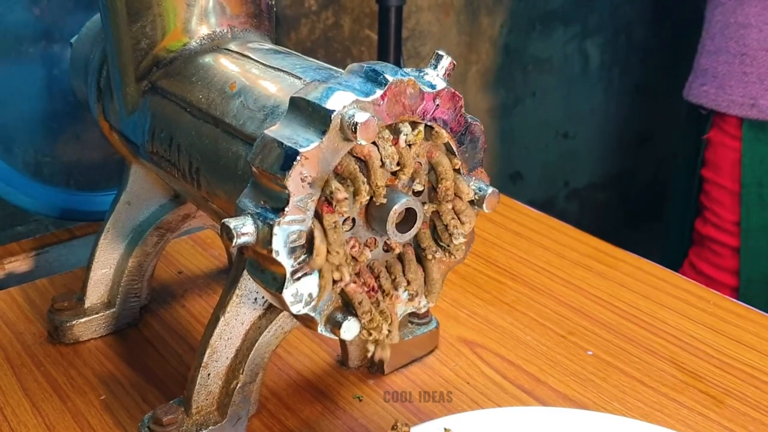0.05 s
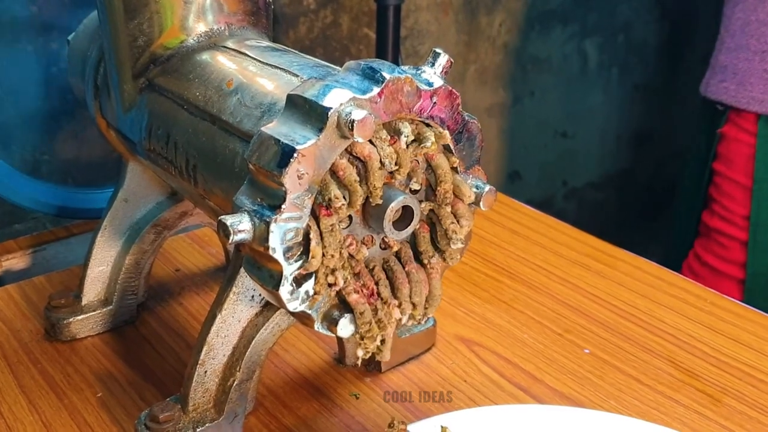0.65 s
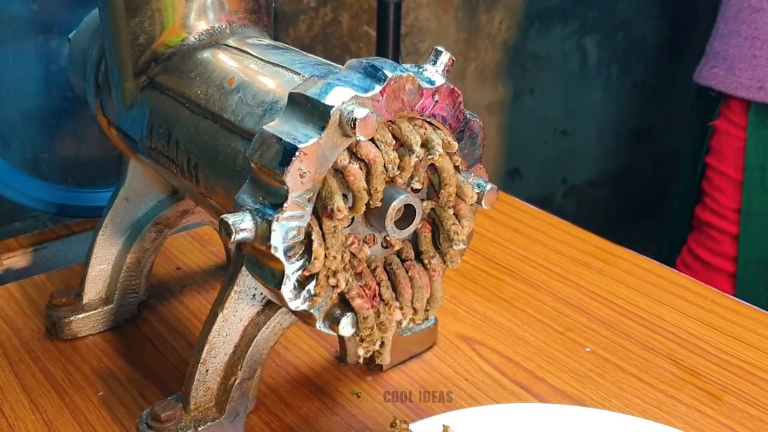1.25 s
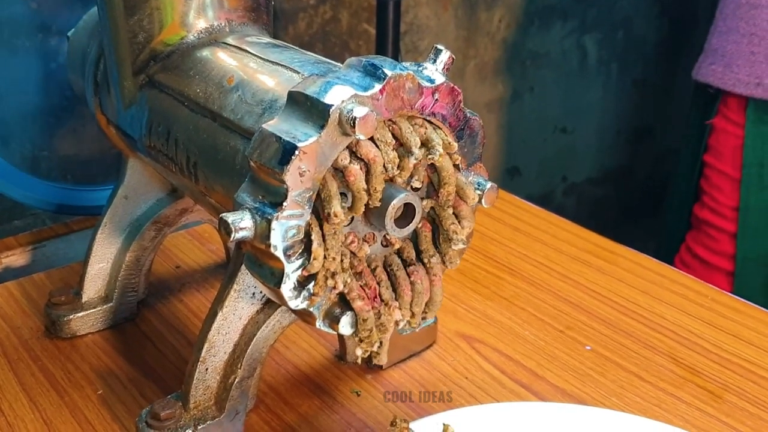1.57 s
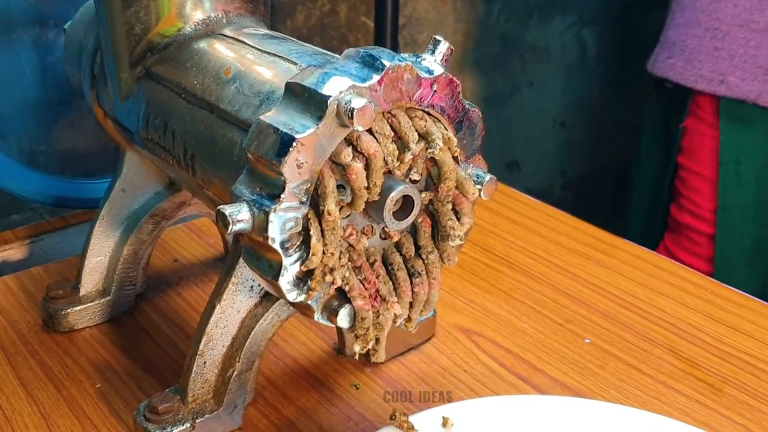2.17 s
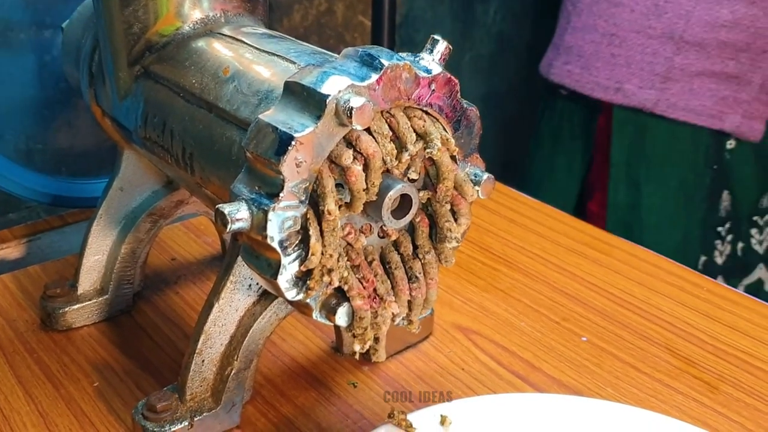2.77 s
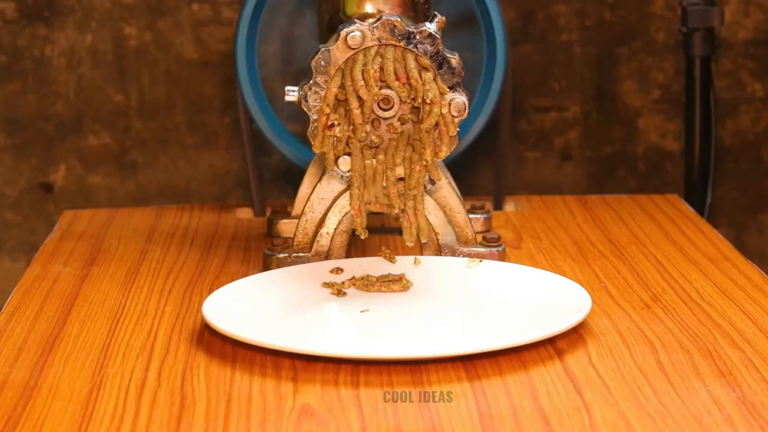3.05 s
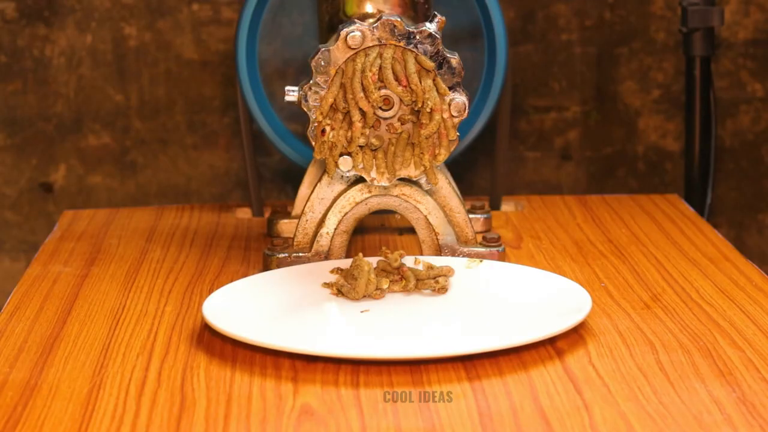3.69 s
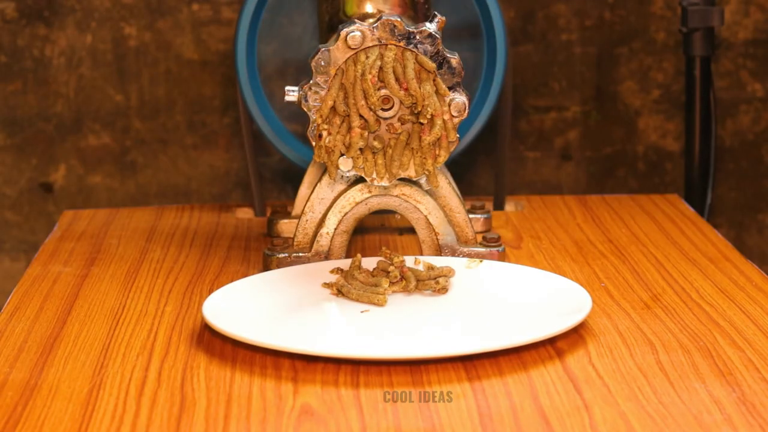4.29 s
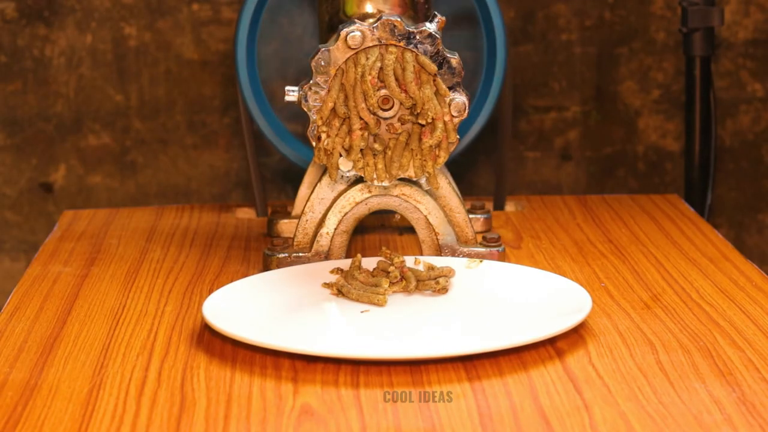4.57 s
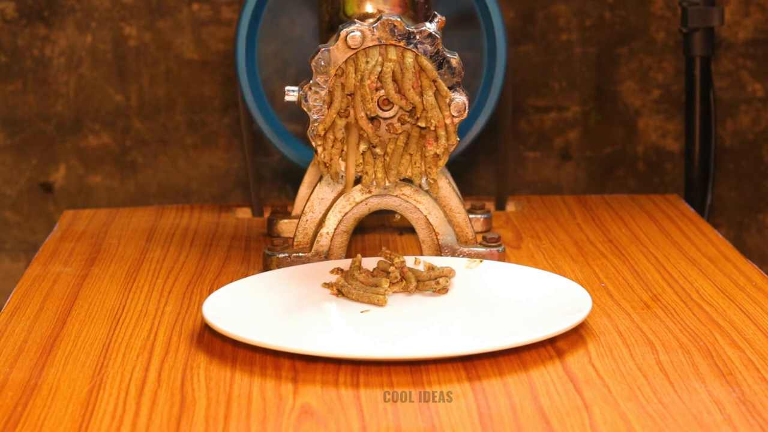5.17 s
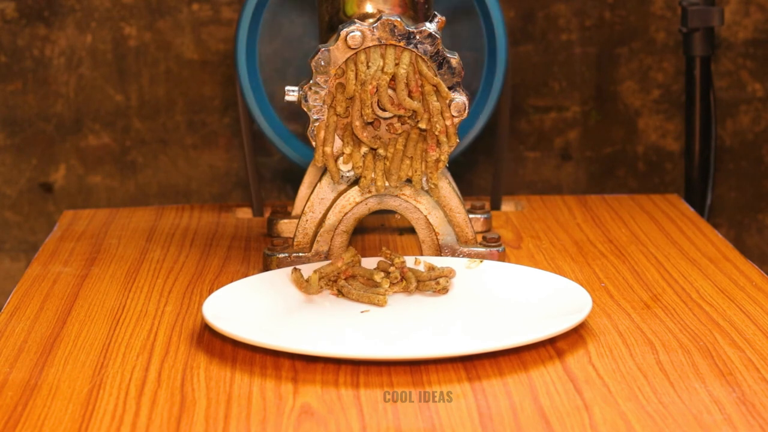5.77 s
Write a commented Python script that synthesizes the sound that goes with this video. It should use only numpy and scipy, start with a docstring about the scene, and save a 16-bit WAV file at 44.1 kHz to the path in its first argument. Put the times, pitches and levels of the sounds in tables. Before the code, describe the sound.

An electric meat grinder throbs and clatters as wet mince pops, before the sound suddenly turns lighter and more distant.

```python
"""On a wooden table, a belt-driven meat grinder minces fish. The motor hums and the drive pushes about
seven times a second. With each push the table throbs and the auger rattles and knocks, exciting the
resonances of its cast barrel and frame, while air pockets pop in the wet mince leaving the plate.
It is heard first from close beside the barrel, boomy and wide, then from the front, thinner and
farther off."""
import sys
import numpy as np
from scipy import signal
from scipy.fft import rfft, irfft, next_fast_len
from scipy.io import wavfile
from scipy.ndimage import map_coordinates

SR = 44100
rng = np.random.default_rng(int(sys.argv[2]) if len(sys.argv) > 2 else 0)


def to_wav(sig):
    """Store sig (one row per channel, or 1-D mono) as 16-bit WAV at the path in sys.argv[1].

    Samples outside -1..1 are clipped; the rate is SR.
    """
    pcm = np.clip(np.atleast_2d(sig), -1, 1) * 32767
    pcm = np.round(pcm).astype(np.int16)
    wavfile.write(sys.argv[1], SR, pcm.T)  # frames by channels


N = 257544
TIME = np.arange(N) / SR
CUT_S = 2.97  # the scene changes from beside the barrel to the front
STROKE_HZ, FIRST_STROKE_S = 7.2, .1  # pushes of the drive
SIDE, FRONT = 2, 3  # level columns of the mode tables; all table levels are relative

# Hard knocks of the auger in the barrel: time_s, clack_db, thud_db, clink_db
HARD_KNOCKS = [(0.076, -31, -29, -32), (0.221, -21, -20, -39), (0.263, -27, -21, -46),
               (0.314, -21, -23.5, -33.5), (0.349, -20.5, -23, -37), (0.381, -19, -42, -47),
               (0.437, -20.5, -21, -45), (0.505, -21, -15.5, -35), (0.573, -25, -23, -38),
               (0.72, -18.5, -15.5, -39), (0.746, -14, -14, -39), (0.759, -19.5, -17, -41),
               (0.7908, -16, -12.5, -16.5), (0.9, -17, -17, -48), (0.911, -18.5, -20.5, -47),
               (0.961, -21, -16, -46), (1.0425, -20.5, -17.5, -45), (1.0677, -20, -26, -20.5),
               (1.183, -18.5, -18.5, -51), (1.3191, -17, -24, -42), (1.41, -20.5, -30, -50),
               (1.462, -23.5, -20, -27), (1.49, -18.5, -14.5, -34), (1.609, -19, -24, -35),
               (1.6301, -15.5, -10.5, -17.5), (1.719, -17, -25, -51), (1.742, -23, -17, -33),
               (1.763, -18, -24, -24), (1.881, -19.5, -12.5, -24.5), (2.015, -23, -33, -47),
               (2.073, -20, -33, -50), (2.151, -18, -16, -35), (2.164, -35, -18.5, -42),
               (2.178, -19.5, -17.5, -20.5), (2.287, -20, -25, -48), (2.322, -19, -11, -42),
               (2.35, -22.5, -22, -31), (2.368, -19, -19, -53), (2.423, -19.5, -18, -50),
               (2.472, -22.5, -32, -38), (2.563, -19, -21, -42), (2.702, -18.5, -19, -45),
               (2.838, -18.5, -15, -42), (2.868, -19.5, -14.5, -23), (2.973, -18, -21, -36),
               (3.107, -24, -30, -52), (3.327, -28, -42, -46), (3.415, -23, -29.5, -49),
               (3.601, -22.5, -35, -37), (3.643, -24.5, -33, -54), (3.703, -20.5, -26.5, -42),
               (3.997, -19.5, -28.5, -36), (4.058, -30, -34, -39), (4.201, -29, -30.5, -54),
               (4.238, -22, -27, -40), (4.26, -22, -31.5, -42), (4.286, -23.5, -30.5, -45),
               (4.403, -30, -29.5, -40.5), (4.52, -21.5, -28, -54), (4.693, -20, -31, -33.5),
               (4.848, -27.5, -45, -57), (4.968, -19, -29, -34), (5.117, -21, -29, -47),
               (5.242, -21, -33, -48), (5.261, -28, -31, -43), (5.39, -26.5, -32.5, -40),
               (5.637, -23, -27, -49), (5.675, -21, -28.5, -45), (5.805, -19, -27.5, -34)]
# The housing rocks on its feet: start_s, level_db, length_s
HOUSING_CLUNKS = [(0.253, -23, 0.012), (0.437, -21, 0.012), (0.502, -22.5, 0.013), (0.584, -22, 0.0083),
                  (0.718, -21, 0.0071), (0.922, -23.5, 0.015), (1.067, -21.5, .012), (1.212, -20, 0.011),
                  (1.315, -16.5, 0.0096), (1.547, -19, 0.0091), (1.631, -16.5, 0.0081),
                  (1.877, -19, 0.0086), (2.022, -22, 0.018), (2.295, -21, 0.026), (2.334, -22.5, 0.024),
                  (2.844, -21.5, 0.019), (3.036, -36, 0.015), (3.226, -33, .03), (3.575, -32, 0.015),
                  (3.641, -28.5, 0.037), (3.849, -30, 0.0098), (3.886, -32, 0.013), (4.055, -30, 0.0062),
                  (4.398, -30, 0.023), (4.579, -31.5, 0.015), (4.989, -32, 0.024), (5.662, -32.5, 0.043)]
# Modes of the cast metal: pitch_hz, bandwidth_hz, side_db, front_db
CASTING_MODES = [(1146, 43, 1.5, -20), (1578, 12, -24, 3), (1884, 16, 1.5, 2.5), (2494, 53, -16, -1.5),
                 (2630, 65, 3, -20), (2906, 23, -19, -3), (3640, 15, 10.5, 6.5), (5370, 47, 6, -15),
                 (5250, 45, -22, 8), (5780, 26, -22, 15), (7250, 87, -20, 11)]


def grinder_beside():
    """Resonance beside the barrel: a booming frame, knocks with a strong, quickly dying tail, wide image."""
    # Load on the auger: time_s, rattle_db, grind_db
    load = [(0.02, -24, -31), (0.34, -25, -33), (1.19, -26, -33.5), (1.7, -22.5, -32.5),
            (2.03, -24.5, -35.5), (2.42, -27, -36.5), (2.82, -26, -37.5), (2.93, -26, -37.5)]
    # Response of table and frame: frequency_hz, gain_db
    body = [(25, -50), (53, -32.5), (90, -3.5), (146, 3.5), (193, -2.5), (238, -9.5), (327, -5.5),
            (382, -2.5), (467, -12), (486, -27), (510, -5), (572, -22.5), (618, -13.5), (707, -22),
            (841, -31.5), (900, -25), (1170, -56), (1980, -120)]
    # Response of the barrel: frequency_hz, gain_db
    barrel = [(410, -15.5), (700, -0.5), (852, 4.5), (946, -0.5), (1150, 0.5), (1640, -5.5), (2330, -9),
              (2700, -12), (3070, -16), (4920, -13), (7390, -28.5), (8530, -34), (12200, -28), (15000, -41),
              (16000, -34)]
    # Likeness of left and right: frequency_hz, correlation
    coherence = [(60, 0.98), (130, 0.99), (290, 0.91), (640, 0.55), (1410, 0.32), (3100, 0.02),
                 (6820, 0.02), (15000, -0.05)]
    # Left level minus right: frequency_hz, difference_db
    balance = [(60, 1.0), (110, 2), (200, 0.48), (380, 0.77), (700, 2.6), (1290, 1.9), (2380, 5.1),
               (4400, 8.2), (8120, 2.2), (15000, 4.3)]
    hits = [k for k in HARD_KNOCKS if k[0] < CUT_S]
    grip = slack(hits, dip_db=-6)
    hits += taps(hits, late_s=-.024, scatter_s=.006, clack_db=-23, thud_db=-24, clink_db=-47)
    drag = aftermath([(k[0], k[1]) for k in hits], level_db=-17.5, delay_s=.0053, width_s=.013)
    shudder = aftermath([(k[0], k[2]) for k in hits], level_db=-8.5, delay_s=.0034, width_s=.02)
    push = surge(late_s=.0015, width_s=.015)
    sound = grip * churn(load, push, drag, shudder, body, barrel, SIDE, rattle_db=.5, grind_db=-2.52,
                         rattle_push_db=1.5, grind_push_db=1, metal_db=-5,
                         rate=500, spread_db=3, smooth_db=3, scrape_t60=.05)
    sound += knocks(hits, body, barrel, SIDE, clack_db=13, thud_db=22.5, clink_db=25.5, crack_db=15,
                    contact_t60=.021, tail_t60=.085, tail_db=.5, rebound_s=.0098, rebound_db=-5)
    sound += clunks([c for c in HOUSING_CLUNKS if c[0] < CUT_S], SIDE, level_db=-1)
    motor = motor_hum(column=1, waver_db=1) * amp([[.6], [-.6]])
    return stereo(sound, coherence, balance, lead_rad=.33) + motor


def grinder_front():
    """Reverberation farther off, in front: knocks with a longer tail, less boom and more smacking."""
    # Load on the auger: time_s, rattle_db, grind_db
    load = [(3.03, -32, -38.5), (3.36, -35.5, -40.5), (4.38, -34.5, -37.5), (4.64, -36, -39.5),
            (5.66, -36, -39.5), (5.8, -38, -41)]
    # Response of table and frame: frequency_hz, gain_db
    body = [(53, -55.5), (90, -14), (194, -8), (244, -21.5), (284, -15), (361, -11), (392, -9.5), (438, -2),
            (470, -8), (509, -14.5), (560, -10.5), (620, -14), (668, -7.5), (777, -15.5), (904, -14.5),
            (1000, -19.5), (1300, -73), (2200, -120)]
    # Response of the barrel: frequency_hz, gain_db
    barrel = [(530, -15.5), (900, -3), (1020, 0), (1170, 0), (1510, -9), (1900, -7.5), (2040, -8.5),
              (2960, -13.5), (3300, -17), (3770, -13), (5220, -26), (7140, -20.5), (10000, -25),
              (14500, -42), (16000, -37)]
    # Likeness of left and right: frequency_hz, correlation
    coherence = [(60, 1.0), (130, 1.0), (290, 0.98), (640, 0.97), (1410, 0.78), (3100, 0.69), (6820, 0.51),
                 (15000, 0.23)]
    # Left level minus right: frequency_hz, difference_db
    balance = [(60, 0.0), (110, 0.0), (200, 0.0), (380, -1.5), (700, -0.5), (1290, -1.0), (2380, -3.5),
               (4400, -2.0), (8120, -3.5), (15000, -3.5)]
    hits = [k for k in HARD_KNOCKS if k[0] >= CUT_S]
    grip = slack(hits, dip_db=-5)
    hits += taps(hits, late_s=.012, scatter_s=.012, clack_db=-29.5, thud_db=-38, clink_db=-54)
    drag = aftermath([(k[0], k[1]) for k in hits], level_db=-19.5, delay_s=.0029, width_s=.018)
    shudder = aftermath([(k[0], k[2]) for k in hits], level_db=-2.5, delay_s=.0093, width_s=.0084)
    push = surge(late_s=.017, width_s=.0051)
    sound = grip * churn(load, push, drag, shudder, body, barrel, FRONT, rattle_db=-1, grind_db=-6,
                         rattle_push_db=-4, grind_push_db=4.5, metal_db=-19,
                         rate=350, spread_db=.5, smooth_db=.5, scrape_t60=.041)
    sound += knocks(hits, body, barrel, FRONT, clack_db=9.5, thud_db=24.5, clink_db=34.5, crack_db=17,
                    contact_t60=.029, tail_t60=.11, tail_db=-3.5, rebound_s=.0054, rebound_db=-7)
    sound += clunks([c for c in HOUSING_CLUNKS if c[0] >= CUT_S], FRONT, level_db=1.5)
    sound += groan(load, FRONT, level_db=-40.5, load_share=.62)
    sound += smacking(level_db=-5.5, between_db=-56, sizzle_db=-12)
    motor = motor_hum(column=2, waver_db=1.6) * amp([[-.5], [.5]])
    return stereo(sound, coherence, balance, lead_rad=-.13) + motor


def churn(load, push, drag, shudder, body, barrel, column, rattle_db, grind_db,
          rattle_push_db, grind_push_db, metal_db, rate, spread_db, smooth_db, scrape_t60):
    """Friction: the auger's small contacts rattle the frame and rasp in the barrel as load varies."""
    rattle_load_db, grind_load_db = curves(load)
    contacts = grains(rate, spread_db)
    rattle = unit(ring(contacts + grains(rate=900, spread_db=-2.5), body))
    rasp = ring(scrapes(contacts, scrape_t60) + amp(smooth_db) * rng.standard_normal((2, N)), barrel)
    rasp = unit(rasp + amp(metal_db) * casting_ring(rasp, column))
    rattle_gain = np.hypot(amp(rattle_load_db + rattle_db + rattle_push_db * push), shudder)
    rasp_gain = np.hypot(amp(grind_load_db + grind_db + grind_push_db * push), drag)
    return rattle_gain * rattle + rasp_gain * rasp


def grains(rate, spread_db):
    """A Poisson process: two trains of tiny contacts of uneven size at shared random moments."""
    hit = rng.random(N) < rate / SR
    size = amp(spread_db * np.minimum(rng.exponential(size=N), 3))
    return unit(hit * size * rng.standard_normal((2, N)))


def scrapes(contacts, t60):
    """Exponential decay: each contact's energy dies away as a short burst of noise."""
    energy = signal.lfilter([1], [1, -amp(-120 / (t60 * SR))], np.mean(contacts ** 2, axis=0))
    return unit(np.sqrt(energy) * rng.standard_normal((2, N)))


def casting_ring(rasp, column, top_hz=3800):
    """Forced vibration: soft contacts shake only the lower modes of the casting."""
    return filtered(rasp, lambda hz: resonance(CASTING_MODES, column, hz) / (1 + (hz / top_hz) ** 6))


def surge(late_s, width_s):
    """Periodic forcing: a Gaussian bump from 0 to 1 at every stroke of the drive."""
    turn = ((TIME - FIRST_STROKE_S - late_s) * STROKE_HZ + .5) % 1 - .5
    return np.exp(-.5 * (turn / STROKE_HZ / width_s) ** 2)


def slack(hits, dip_db, early_s=.005, width_s=.007):
    """Loss of contact: the grinding dips as the auger runs free just before a hard knock."""
    free = np.max([np.exp(-((TIME - k[0] + early_s) / width_s) ** 2) for k in hits], axis=0)
    return amp(dip_db * free)


def aftermath(hits, level_db, delay_s, width_s):
    """Swells that add in power: after each (time_s, level_db) hit the auger drags or the frame shakes."""
    power = sum(amp(2 * db) * np.exp(-((TIME - s - delay_s) / width_s) ** 2) for s, db in hits)
    return amp(level_db) * np.sqrt(power)


def knocks(hits, body, barrel, column, clack_db, thud_db, clink_db, crack_db,
           contact_t60, tail_t60, tail_db, rebound_s, rebound_db):
    """Impact excitation: a knock clacks in the barrel, rings the casting, jolts the frame and rebounds."""
    # Tilt that makes knocks duller than the grinding: frequency_hz, gain_db
    clack_tilt = [(600, 2), (2500, 4.5), (5000, 0.5), (9000, -8), (15000, 1)]
    # Spectrum of steel striking steel: frequency_hz, gain_db
    crack_colour = [(900, -15), (2200, -9), (2750, 12.5), (3300, -22), (4300, -4.5), (5100, -7),
                    (5700, -14), (7500, -27), (12000, -29)]
    clacks, cracks, pushes = np.zeros((3, 2, N))
    for s, clack, thud, clink in hits:
        add(clacks, s, amp(clack + clack_db) * rippled(blow(contact_t60, tail_t60, tail_db)))
        bounce_s = s + rebound_s * (.5 + rng.random())
        add(clacks, bounce_s, amp(clack + clack_db + rebound_db) * blow(contact_t60, tail_t60, tail_db))
        add(clacks, s + .001112, amp(clink + clink_db) * chime(column, vary_db=4))
        add(cracks, s, amp(clink + crack_db) * blow(contact_t60=.012, tail_t60=tail_t60, tail_db=-9))
        add(pushes, s + .00089, amp(thud + thud_db) * np.array([[-1], [.5 * rng.normal()]]))
    return ring(clacks, barrel, clack_tilt) + ring(cracks, crack_colour) + ring(pushes, body)


def taps(hard, late_s, scatter_s, clack_db, thud_db, clink_db, spread_db=2.5):
    """Quasi-periodic impacts: strokes without a hard knock give a light one; rows like HARD_KNOCKS."""
    strokes = FIRST_STROKE_S + late_s + np.arange(int(N / SR * STROKE_HZ)) / STROKE_HZ
    chance = rng.uniform(-1.4, 1, (len(strokes), 4))
    free = [min(abs(s - k[0]) for k in hard) > .02 for s in strokes]
    levels_db = np.array([clack_db, thud_db, clink_db])
    return [(s + scatter_s * c[0], *(levels_db + spread_db * c[1:]))
            for s, c in zip(strokes[free], chance[free])]


def blow(contact_t60, tail_t60, tail_db):
    """Direct and diffuse sound: a brief rough contact of energy 1 and its tail, in two versions."""
    t = np.arange(SR // 4) / SR
    decays = amp(-60 * t / np.array([contact_t60, tail_t60])[:, None, None])
    contact, tail = rng.standard_normal((2, 2, len(t))) * decays
    return (unit(contact) + amp(tail_db) * unit(tail)) / np.sqrt(len(t))


def rippled(burst, spacing_hz=260, depth_db=2.5):
    """Point of impact: each knock lands elsewhere and favours other pitches, at the same energy."""
    size = burst.shape[1]
    knot = np.fft.rfftfreq(size, 1 / SR) / spacing_hz
    ripple = map_coordinates(rng.standard_normal(int(knot[-1]) + 4), [knot])
    margin = SR // 400
    spectrum = rfft(np.roll(burst, margin, axis=1)) * amp(depth_db * ripple)
    coloured = irfft(spectrum, size)[:, margin:-margin]
    return coloured * np.linalg.norm(burst) / np.linalg.norm(coloured)


def chime(column, vary_db):
    """Free vibration: the casting's damped modes ring in a new balance each time, in two versions."""
    t, modes = np.arange(SR // 4) / SR, np.array(CASTING_MODES)
    hz, width = modes[:, :1], modes[:, 1:2]
    level, other = rng.standard_normal((2, len(modes)))
    waves = 2 * np.pi * width / SR * np.exp(-np.pi * width * t) * np.cos(2 * np.pi * hz * t)
    gains = amp(modes[:, column] + vary_db * level)
    return np.array([gains, gains * other]) @ waves


def clunks(rows, column, level_db):
    """Transient excitation: each time the housing rocks, a short rough shove rings its low modes."""
    sound, t = np.zeros((2, N)), np.arange(SR // 4) / SR
    response = housing(column, np.fft.rfftfreq(len(t), 1 / SR))
    for s, db, length_s in rows:
        shove = rng.standard_normal((2, len(t))) * (t < length_s)
        clunk = irfft(rfft(shove) * response, len(t))
        clunk /= np.linalg.norm(clunk, axis=1, keepdims=True)
        add(sound, s, amp(db + level_db) * np.sqrt(length_s * SR) * clunk)
    return sound


def groan(load, column, level_db, load_share, flutter_db=1.3):
    """Sustained excitation: the drive keeps the housing's modes groaning, louder as the auger labours."""
    load_db = curves(load)[0]
    excess_db = load_db - load_db[round(CUT_S * SR):].mean()
    gain = amp(level_db + load_share * excess_db + flutter_db * wobble(24))
    return gain * unit(filtered(rng.standard_normal((2, N)), lambda hz: housing(column, hz)))


def housing(column, hz, low_hz=150, high_hz=900):
    """Band-pass response of the heavy housing: its low modes, without deep bass or treble."""
    # Modes of the housing: pitch_hz, bandwidth_hz, side_db, front_db
    modes = [(314, 19, -7, -20.5), (362.5, 25, 11.5, -13), (437, 29, -1.5, 1.5), (664, 30.5, -10.5, -1),
             (688, 64, -35.5, -17)]
    return resonance(modes, column, hz) * hz ** 4 / (hz ** 4 + low_hz ** 4) / (1 + (hz / high_hz) ** 6)


def table_throb(swell_db, late_s, width_s, steady_db, uneven_db):
    """Structure-borne sound: the table rumbles in short swells, one for each stroke of the drive."""
    # Response of the wooden table: frequency_hz, gain_db
    wood = [(20, -66), (35, -58), (46, -4), (58, 6.5), (68, 0.5), (77, -7), (95, -4.5), (125, -5),
            (220, -55)]
    # How hard the drive shakes the table: time_s, level_db
    shaking = [(0.0, -20.5), (1.7, -16), (2.89, -12), (2.99, -38.5), (5.84, -49)]
    swells = amp(swell_db + uneven_db * wobble(STROKE_HZ)) * surge(late_s, width_s)
    analytic = signal.hilbert(ring(rng.standard_normal((1, N)), wood)[0])
    even = np.cos(np.angle(analytic))[None]  # phase only, so the swells shape the strength
    rumble = unit(ring(even, [(32, -18.5), (47, .5), (110, 7.5), (250, -24.5)]))
    return rumble * amp(curves(shaking)[0]) * (swells + amp(steady_db)) * amp([[.5], [-.5]])


def squelch(side_db, front_db, crackle_db):
    """Air pockets burst in the mince: sharp and set in fine crackle close by, softer from the front."""
    # The largest air pockets: start_s, level_db, pitch_hz
    pockets = [(0.05, -24, 12900), (0.382, -26.5, 15500), (0.5741, -37, 11000), (0.7447, -33, 14700),
               (0.7574, -36, 7220), (0.7901, -41, 8100), (0.8046, -34, 12300), (0.8994, -43, 7070),
               (0.9617, -38, 11000), (1.3189, -41, 7060), (1.487, -34, 12500), (1.6062, -35, 12300),
               (1.7424, -37, 14800), (2.0138, -35, 15100), (2.1495, -42, 7000), (2.177, -46, 7050),
               (2.3476, -38, 11300), (2.388, -36, 8580), (2.4219, -40, 10600), (2.8374, -37, 9390),
               (2.974, -25.5, 6960), (3.094, -36, 7040), (3.4136, -40, 7120), (3.8866, -38, 7310),
               (3.936, -34, 7140), (4.2114, -37, 9810), (4.2373, -38, 7610), (4.836, -32, 7360),
               (4.951, -30, 7110), (5.0865, -32, 7170), (5.2404, -37, 9510), (5.5648, -35, 7260),
               (5.6074, -34, 8200), (5.764, -39, 7100)]
    crackle = bubbles(rate=90, spread_db=8, low_hz=8000, high_hz=16000, life_s=.0003)
    sound = (TIME < CUT_S) * amp(crackle_db) * crackle
    for s, db, hz in pockets:
        if s < CUT_S:
            burst = amp(db + side_db) * pop(hz, contact_t60=.008, tail_t60=.04, octaves=.35, broad_db=-5)
        else:
            burst = amp(db + front_db) * pop(hz, contact_t60=.018, tail_t60=.08, octaves=.25, broad_db=-10)
        add(sound, s, burst)
    return sound


def pop(pitch_hz, contact_t60, tail_t60, octaves, broad_db):
    """Cavity resonance: a bursting pocket gives a broad snap of energy 1 with a peak at its own pitch."""
    # Broad spectrum of popping mince: frequency_hz, gain_db
    mince = [(600, -20), (1500, 3), (4000, 17), (7000, 1), (11000, 3), (15500, -3)]
    snap = blow(contact_t60, tail_t60, tail_db=-4)
    size = snap.shape[1]
    hz = np.fft.rfftfreq(size, 1 / SR)
    peak = np.exp(-.5 * (np.log2((hz + 1) / pitch_hz) / octaves) ** 2)
    colour = peak + amp(broad_db + along(mince, hz))
    return unit(irfft(rfft(snap) * colour, size)) / np.sqrt(size)


def smacking(level_db, between_db, sizzle_db, clump_db=2):
    """Adhesion fails: sticky strands tear from the plate in clumps of tiny snaps over a faint sizzle."""
    # Tearing strands: middle_s, level_db, length_s
    tears = [(3.117, -46, 0.043), (3.297, -50.5, .05), (3.406, -50, 0.038), (3.58, -49.5, 0.039),
             (3.66, -51, .03), (3.707, -52, 0.027), (3.834, -49, 0.04), (3.932, -43, 0.024),
             (3.99, -48, 0.033), (4.103, -46.5, 0.047), (4.247, -44, 0.063), (4.387, -51, .08),
             (4.542, -46.5, 0.051), (4.684, -42.5, 0.034), (4.805, -43, 0.027), (4.84, -43.5, 0.028),
             (4.97, -45.5, 0.078), (5.018, -44, 0.033), (5.093, -46, 0.024), (5.188, -50, 0.031),
             (5.233, -46.5, 0.034), (5.38, -49, .04), (5.507, -47.5, .045), (5.647, -44.5, 0.043),
             (5.79, -43.5, 0.033)]
    # Spectrum of the tearing: frequency_hz, gain_db
    colour = [(2500, -62), (4800, -5), (5800, 0.5), (6400, -0.5), (7100, 3), (7800, -5.5), (8900, -5),
              (9700, -3.5), (12000, -6.5), (16000, -10)]
    power = amp(2 * between_db)
    power += sum(amp(2 * db) * .5 ** ((2 * (TIME - s) / length_s) ** 2) for s, db, length_s in tears)
    snaps = bubbles(rate=1100, spread_db=7, low_hz=4500, high_hz=12000, life_s=.00028)
    clumps = amp(level_db + clump_db * wobble(90))
    sizzle = amp(sizzle_db) * rng.standard_normal((2, N))
    return np.sqrt(power) * clumps * unit(ring(snaps + sizzle, colour))


def bubbles(rate, spread_db, low_hz, high_hz, life_s):
    """Damped oscillators: tiny wet snaps of random moment, pitch, size and life, in two versions."""
    t = np.arange(SR // 200) / SR
    when, pitch, size, life, *phases = rng.random((int(rate * N / SR), 6)).T[..., None]
    hz = low_hz * (high_hz / low_hz) ** pitch
    envelope = amp(-spread_db * np.log(size + .05)) * np.exp(-t / (life_s * (.5 + life)))
    at = ((when * N).astype(int) + np.arange(len(t))).ravel()
    versions = [envelope * np.sin(2 * np.pi * (hz * t + phase)) for phase in phases]
    return unit(np.array([np.bincount(at, snaps.ravel(), N)[:N] for snaps in versions]))


def motor_hum(column, waver_db, hum_hz=100.08):
    """Magnetic forces hum at multiples of twice the mains frequency, each line wavering a little."""
    # Lines of the hum: multiple, side_db, front_db
    lines = [(1, -38, -53), (2, -47, -55), (3, -48, -56), (5, -39.5, -39.5), (6, -53, -57)]
    sound = np.zeros(N)
    for line in lines:
        gain = amp(line[column] + waver_db * wobble(11))
        phase = 2 * np.pi * (line[0] * hum_hz * TIME + rng.random()) + .038 * wobble(5)
        sound += gain * np.sin(phase)
    return np.sqrt(2) * sound


def stereo(pair, coherence, balance, lead_rad):
    """Interaural coherence: two signals become left and right, alike in the bass, apart in the treble."""
    def width(hz):
        return np.tan(np.arccos(np.clip(along(coherence, hz), 0, 1)) / 2)
    mid, other = pair
    left_lead = filtered(mid, lambda hz: 1j * np.sin(lead_rad) * width(hz))
    side = left_lead + np.cos(lead_rad) * filtered(other, width)
    ears = np.array([mid + side, mid - side])
    return filtered(ears, lambda hz: amp(np.outer([.5, -.5], along(balance, hz))))


def resonance(modes, column, hz):
    """Modal superposition: the summed response of (pitch_hz, bandwidth_hz, levels...) resonators."""
    return sum(amp(m[column]) * 1j * hz * m[1] / (m[0] ** 2 - hz ** 2 + 1j * hz * m[1]) for m in modes)


def ring(x, *colours, size=8192):
    """Convolution with a minimum-phase body of energy 1, shaped by (frequency_hz, gain_db) curves."""
    hz = np.fft.rfftfreq(size, 1 / SR)
    cepstrum = irfft(np.log(amp(sum(along(c, hz) for c in colours)) + 1e-5))
    cepstrum[1:size // 2] *= 2  # folding the cepstrum makes the body causal
    cepstrum[size // 2 + 1:] = 0
    impulse = irfft(np.exp(rfft(cepstrum)))
    return signal.fftconvolve(x, impulse[None] / np.linalg.norm(impulse), axes=1)[:, :N]


def filtered(x, response):
    """Linear filtering: the spectrum of x times a response of frequency."""
    size = next_fast_len(N + SR // 2)
    return irfft(rfft(x, size) * response(np.fft.rfftfreq(size, 1 / SR)), size)[..., :N]


def add(track, s, burst):
    """Superposition: mix a burst into a track at s seconds."""
    part = track[:, max(round(s * SR), 0):][:, :burst.shape[1]]
    part += burst[:, :part.shape[1]]


def wobble(rate):
    """Smooth random modulation, rate knots a second."""
    return map_coordinates(rng.standard_normal(int(N * rate / SR) + 4), [np.arange(N) * rate / SR])


def curves(rows):
    """Linear interpolation in time: one value per sample for each column after time_s."""
    time_s, *columns = np.transpose(rows)
    return [np.interp(TIME, time_s, values) for values in columns]


def along(points, hz):
    """Interpolation of (frequency_hz, value) points on a logarithmic axis."""
    knots_hz, values = np.transpose(points)
    return np.interp(np.log(hz + 1), np.log(knots_hz + 1), values)


def unit(x):
    """Normalisation to rms 1."""
    return x / np.sqrt(np.mean(x ** 2) + 1e-20)


def amp(db):
    """Decibels to amplitude ratio."""
    return 10 ** (np.asarray(db) / 20)


def scene():
    """A quick equal-power crossfade leads from the side to the front; table and mince add to both."""
    after_cut = np.clip((TIME - CUT_S) / .0082 + .5, 0, 1)
    machine = np.sqrt(1 - after_cut) * grinder_beside() + np.sqrt(after_cut) * grinder_front()
    table = table_throb(swell_db=-13.5, late_s=.0032, width_s=.015, steady_db=-24, uneven_db=4)
    return machine + table + squelch(side_db=14.5, front_db=13, crackle_db=-63.5)


def record(dry):
    """Band limiting: an ideal low-pass removes everything above 16 kHz."""
    return filtered(dry, lambda hz: hz < 16000)


dry = scene()
out = record(dry)
to_wav(out)
```